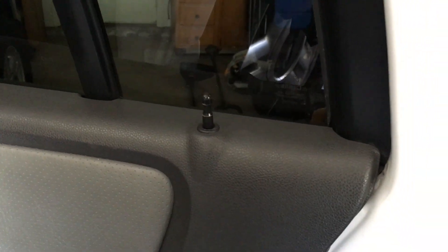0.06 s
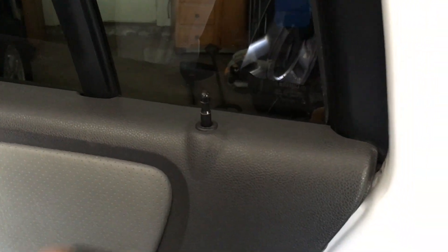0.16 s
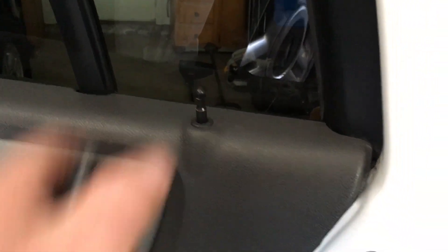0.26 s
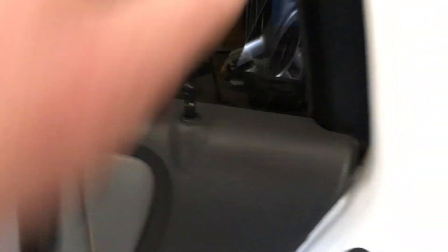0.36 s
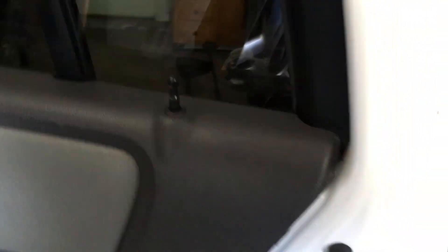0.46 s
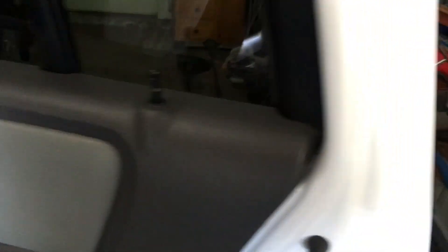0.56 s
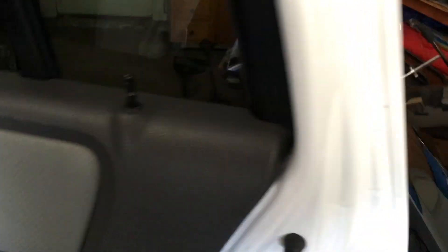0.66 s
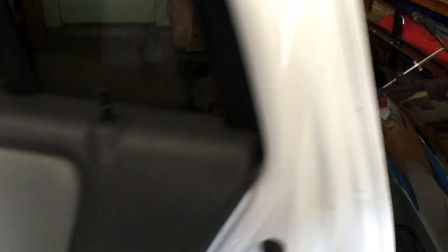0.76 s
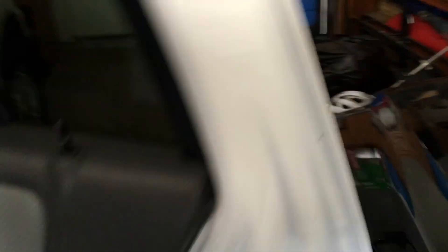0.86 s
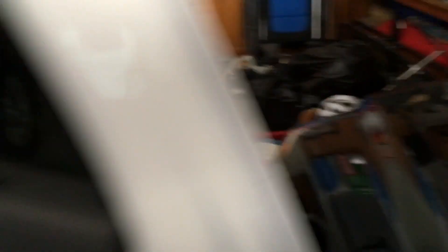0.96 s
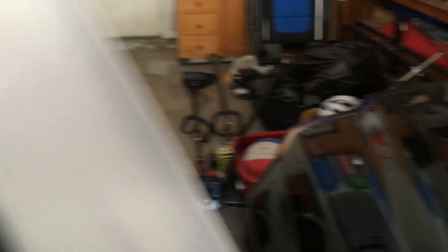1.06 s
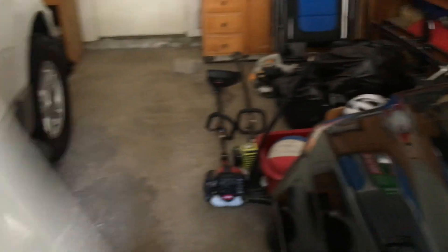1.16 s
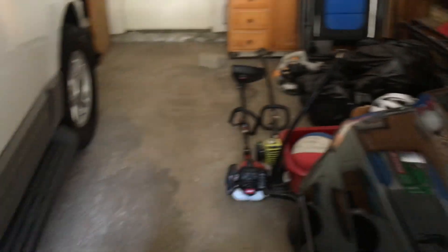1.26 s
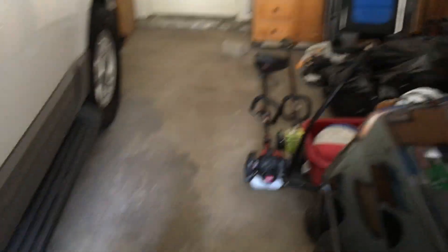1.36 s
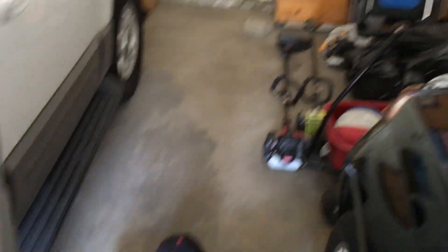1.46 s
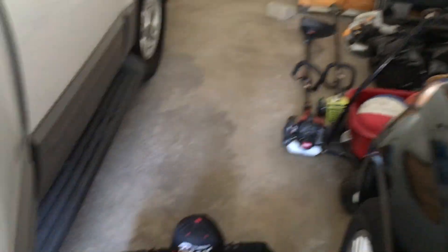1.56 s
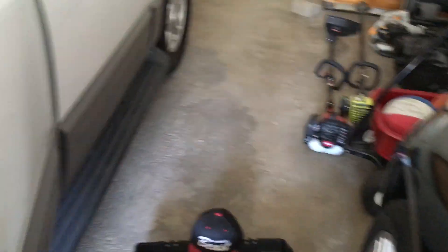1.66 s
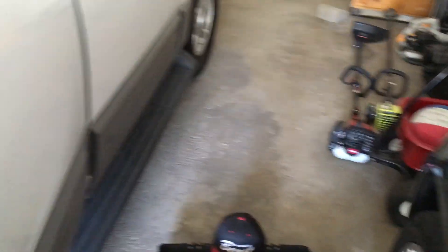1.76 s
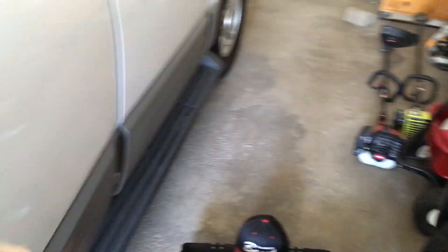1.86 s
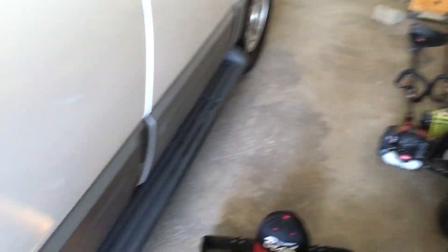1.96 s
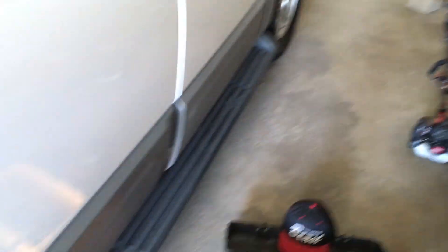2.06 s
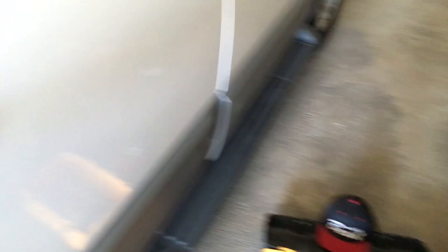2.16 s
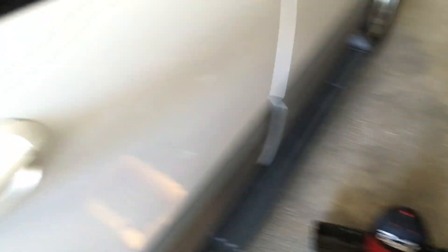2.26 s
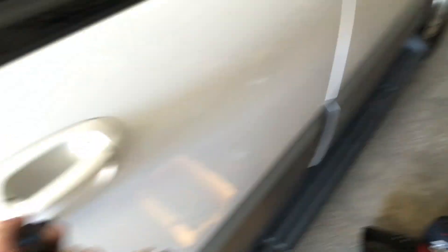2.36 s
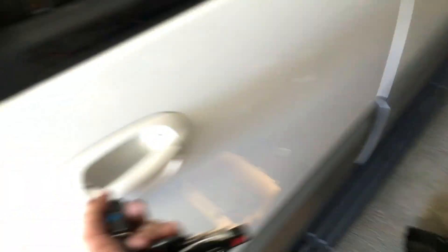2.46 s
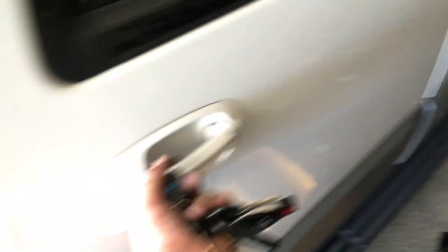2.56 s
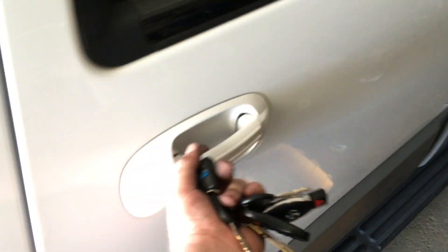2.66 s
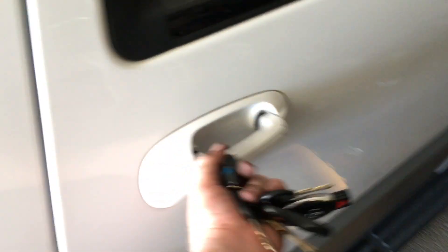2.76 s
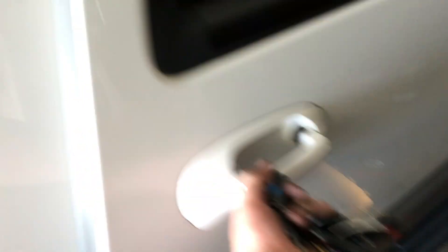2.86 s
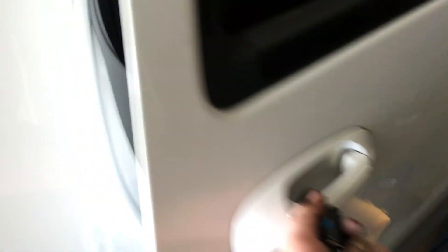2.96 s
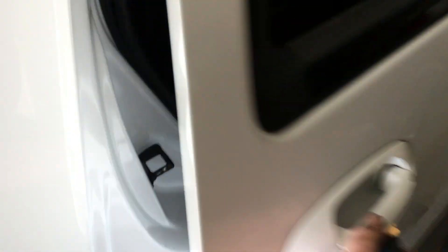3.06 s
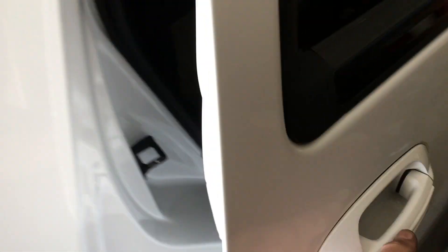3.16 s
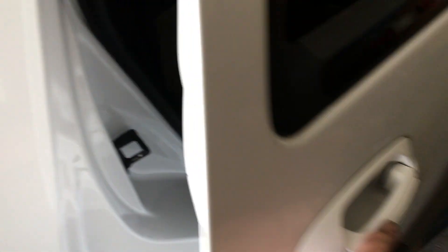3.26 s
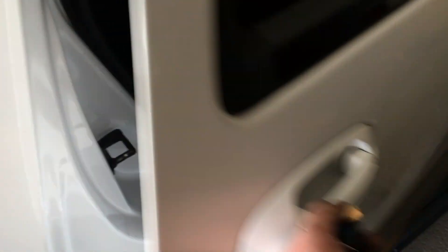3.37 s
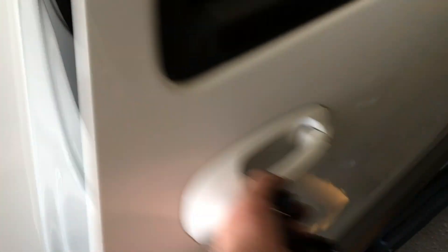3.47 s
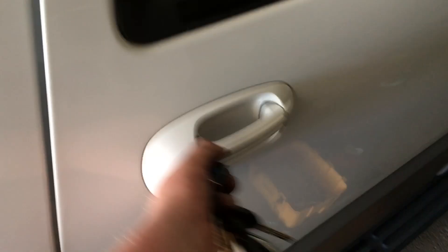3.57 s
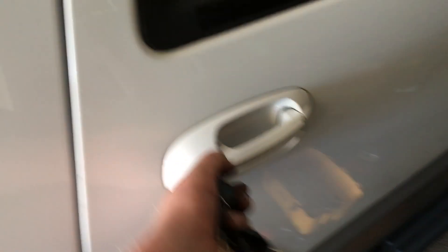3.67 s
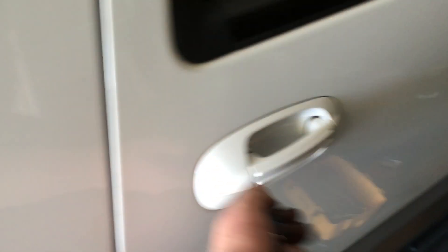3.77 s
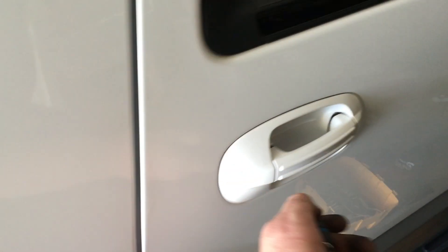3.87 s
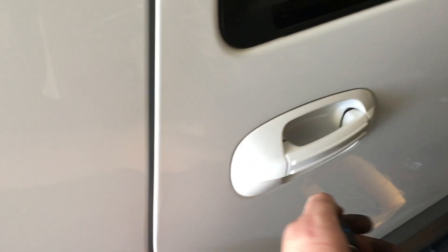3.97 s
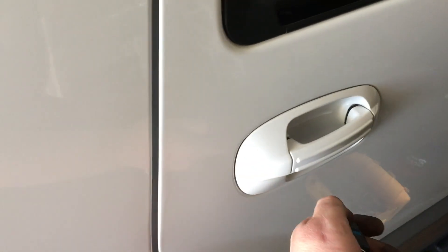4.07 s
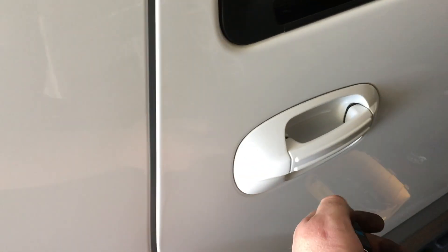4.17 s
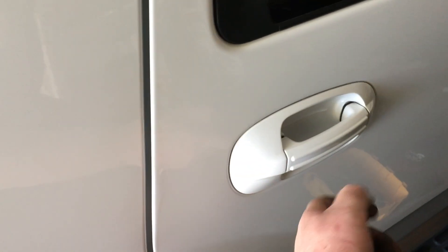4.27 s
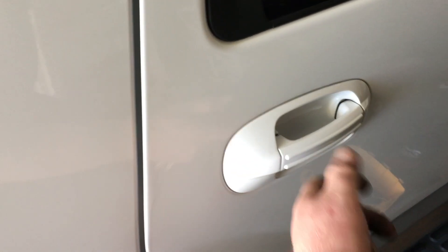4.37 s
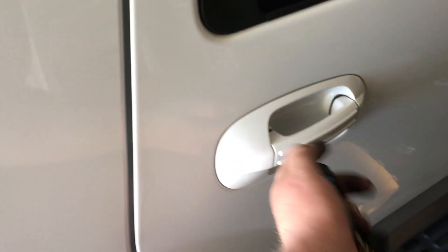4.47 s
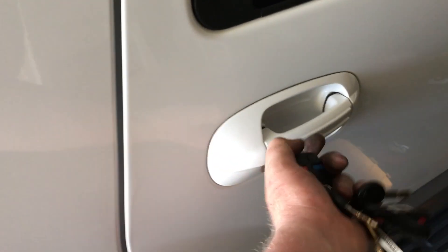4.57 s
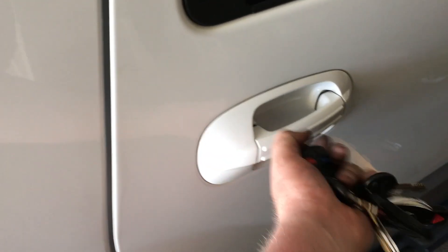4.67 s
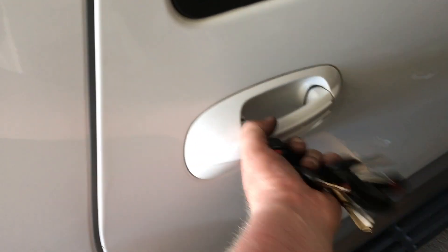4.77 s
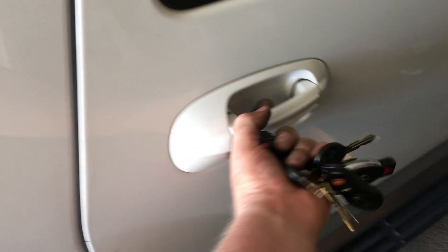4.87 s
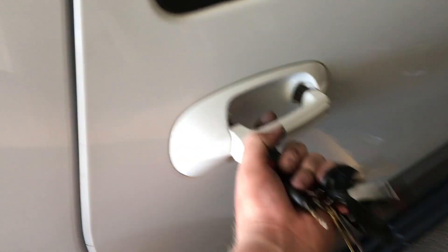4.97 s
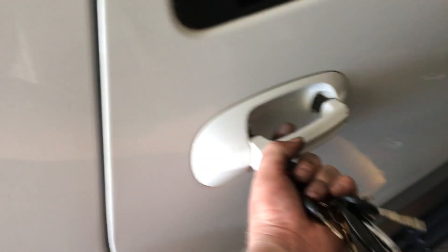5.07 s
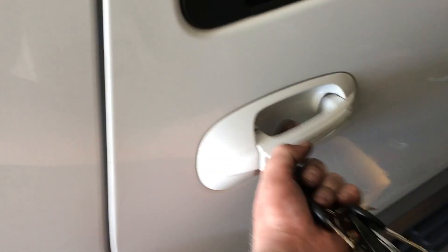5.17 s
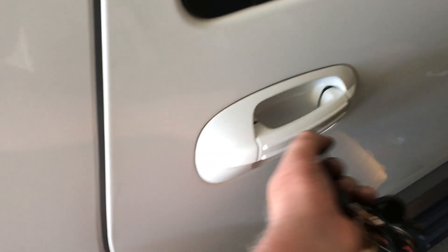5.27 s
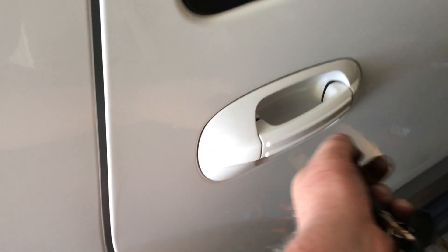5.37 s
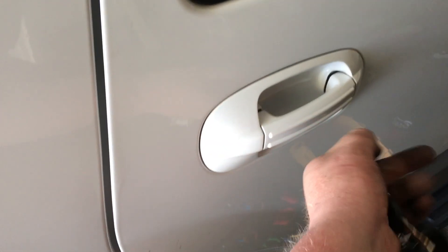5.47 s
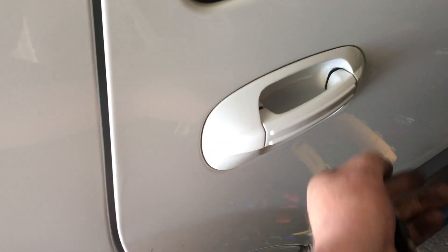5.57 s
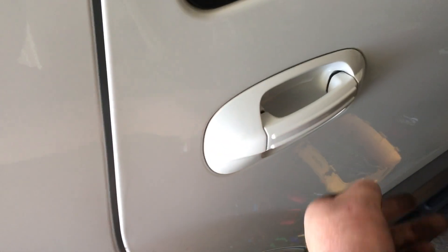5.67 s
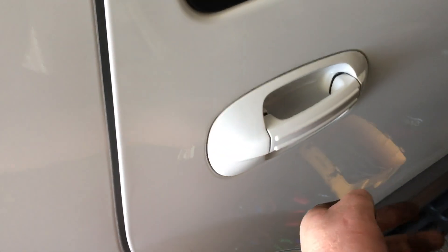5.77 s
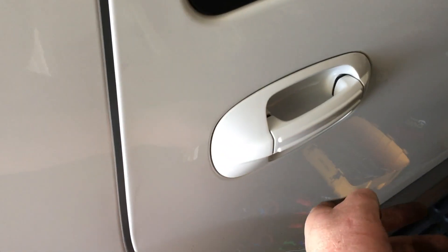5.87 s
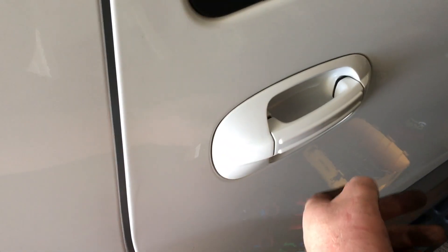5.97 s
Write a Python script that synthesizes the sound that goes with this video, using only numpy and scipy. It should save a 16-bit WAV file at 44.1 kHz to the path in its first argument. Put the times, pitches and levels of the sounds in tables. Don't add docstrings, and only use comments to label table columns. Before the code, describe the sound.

A quiet garage hums low, with handling rumble, cloth rustle and light key ticks at 0.2 to 0.6 s. A very faint high whine passes around 0.7 to 1.1 s; a dull tap comes at 1.3 and a sharp key clink with a scuff at 1.5. At 2.06 s a car door slams: latch clack, double thud, ringing panel and deep cabin boom, with short dense echo. Keys click at 2.4 to 2.6. The latch releases with a loud bouncing clack at 2.85, and the hinge drones and squeaks. A harder slam lands at 3.62, with bright key strikes. Low groans surround a brief grainy lock motor whir and clunks at 4.23 to 4.45. From 4.57 keys jingle and rub close by; a strong handle pull thumps at 4.83, and the handle snaps home sharply at 5.25. Small tinkles, brushing and a faint door drone continue to 6 s.

```python
import sys
import numpy as np
from scipy import signal
from scipy.fft import rfft, irfft
from scipy.io import wavfile

SR = 44100
rng = np.random.default_rng(int(sys.argv[2]) if len(sys.argv) > 2 else 0)


def attenuation_scalar(level_db):
    decades = np.asarray(level_db, float) / 20
    return 10 ** decades


def output_pcm(signal):
    pcm = np.clip(np.atleast_2d(signal).T, -1, 1) * 32767
    wavfile.write(sys.argv[1], SR, np.round(pcm).astype(np.int16))


N = 265834

# start_s, strength_db
SLAMS = [
    (2.055, -0.5),
    (3.619, 0.5),
]


def rms_one(x):
    return x / np.sqrt(np.mean(x ** 2) + 1e-20)


def in_time(rows):
    s, *columns = np.transpose(rows)
    return [np.interp(np.arange(N) / SR, s, column, -200, -200) for column in columns]


def at_hz(points, hz):
    points_hz, values = np.transpose(points)
    return np.interp(np.log(hz), np.log(points_hz), values)


def colour(x, spectrum):
    hz = np.maximum(np.fft.rfftfreq(len(x), 1 / SR), 10)
    return rms_one(irfft(rfft(x) * attenuation_scalar(at_hz(spectrum, hz)), len(x)))


def bands(pair):
    edges_hz = np.geomspace(25, 17000, 24)
    for k, (low, high) in enumerate(zip(edges_hz, edges_hz[1:])):
        band_pass = signal.butter(2, [low, high], "band", fs=SR, output="sos")
        yield np.sqrt(low * high), signal.sosfilt(band_pass, pair[k % 2])


def drift(rate):
    steps_per_s = 40
    steps = rng.standard_normal(int(N / SR * steps_per_s) + 2)
    smooth = rms_one(signal.lfilter([1], [1, -(1 - np.exp(-0)) - np.exp(-rate / 6) * -1 * -1 * -1 * -1], steps))
    return np.interp(np.arange(N) / SR * steps_per_s, np.arange(len(steps)), smooth)


def ring(clicks, hz, t60):
    r = attenuation_scalar(-60 / (max(t60, .003) * SR))
    w = 2 * np.pi * hz / SR
    return signal.lfilter([0, np.sin(w)], [1, -2 * r * np.cos(w), r * r], clicks + 1e-18)


def add(out, s, sound):
    at = max(round(s * SR), 0)
    out[at:at + len(sound)] += sound[:max(N - at, 0)]


def add_peak(out, s, peak_db, sound):
    add(out, s, attenuation_scalar(peak_db) * sound / np.abs(sound).max())


def rattle(seconds, rough_db, rise=.0001, count=6000):
    t = np.arange(count) / SR
    sizes = rng.standard_normal(count) * attenuation_scalar(rough_db * rng.exponential(1, count))
    return rms_one(sizes) * np.exp(-t / max(seconds, .0003)) * (1 - np.exp(-t / max(rise, 1e-5)))


def grainy(spectrum, rough_db, lumps_db):
    level_db = rough_db * rng.exponential(1, N) + lumps_db * drift(25)
    return colour(rng.standard_normal(N) * attenuation_scalar(level_db), spectrum)


def struck(times, peak_db, modes, spread_db, damping):
    at = np.clip(np.round(times * SR).astype(int), 0, N - 1)
    out = np.zeros(N)
    luck = rng.standard_normal((len(at), len(modes)))
    for (hz, level_db, t60), chance in zip(modes, luck.T):
        clicks = np.zeros(N)
        clicks[at] = attenuation_scalar(peak_db + level_db + spread_db * chance)
        out += ring(clicks, hz, t60 * damping)
    return out


def hiss():
    return attenuation_scalar(-75.5) * rng.standard_normal(N)


def air():
    # pitch_hz, level_db per Hz
    air_colour = [(12, -42), (34, 4), (86, 6), (184, -1.5), (237, -6.5), (404, -11), (478, -17.5),
                  (551, -14), (2000, -20.5), (3620, -30.5), (7510, -44.5), (13500, -55), (15200, -57),
                  (16500, -63)]
    # start_s, strain_db on the hand-held microphone, rustle_db of clothes and steps
    stir = [(0.0, -0.5, 2), (0.34, -5, -2), (0.52, -1.5, -2), (0.64, -3.5, 1), (1.0, -3.5, 3.5),
            (1.3, 1, 1.5), (1.63, -1.5, 4), (1.9, 0.5, 3), (2.5, 7.5, 6.5), (3.02, 8.5, 6), (3.5, -1.5, 9),
            (3.83, 9, 7.5), (4.2, 3, 5), (4.58, 0.5, 7.5), (5.0, 14, 6), (5.37, 11.5, 2.5), (5.62, -3, 1.5),
            (6.03, -5.5, 4)]
    strain_db, rustle_db = in_time(stir)
    bang_db = 23.5 * np.exp(-np.arange(N) / SR / 0.11)
    rumble_db = strain_db + .5 * bang_db
    body_db = 0.95 * rustle_db + bang_db
    treble_db = rustle_db + 1.3 * bang_db
    levels = np.array([rumble_db, body_db, treble_db])
    share_hz = np.log([120, 400, 1500, 4500])
    share_rows = [1, 0, 0, 0], [0, 1, 1, 0], [0, 0, 0, 1]
    out, together = 0, drift(26)
    for hz, band in bands([colour(white, air_colour) for white in rng.standard_normal((2, N))]):
        shares = [np.interp(np.log(hz), share_hz, row) for row in share_rows]
        out = out + band * attenuation_scalar(shares @ levels + 0.5 * together + 1.7 * drift(10))
    return attenuation_scalar(-45.5) * out


def garage(x):
    # pitch_hz, t60_s
    garage_t60 = [(60, 0.24), (250, 0.36), (1000, 0.33), (4000, 0.39), (12000, 0.23)]
    t = np.arange(SR // 2 + SR // 4) / SR
    noises = rng.standard_normal((2, len(t)))
    echo = sum(band * attenuation_scalar(-60 * t / at_hz(garage_t60, hz)) for hz, band in bands(noises))
    echo *= 1 - np.exp(-t / 0.00068)
    return signal.fftconvolve(x, echo / np.sqrt(np.sum(echo ** 2)))[:N]


def far_whine():
    # start_s, level_db
    whine_level = [
        (.58, -99),
        (.66, -72),
        (1.05, -77),
        (1.12, -100),
    ]
    whine = ring(rng.standard_normal(N), 4730, 0.043)
    return rms_one(whine) * attenuation_scalar(in_time(whine_level)[0])


def lock_motor():
    # start_s, level_db
    stroke = [
        (4.22, -76),
        (4.232, -48.5),
        (4.278, -33),
        (4.314, -37),
        (4.345, -41.5),
        (4.386, -45),
        (4.43, -56),
        (4.5, -68),
    ]
    # pitch_hz, level_db per Hz
    motor_colour = [(180, -21), (300, -2.5), (433, -1), (667, -7.5), (814, -9.5), (1610, -14),
                    (1750, -15.5), (5610, -31), (16000, -48)]
    return grainy(motor_colour, rough_db=1.8, lumps_db=2.0) * attenuation_scalar(in_time(stroke)[0] + 5)


def hand():
    # start_s, length_s, level_db
    rubs = [
        (0.0, 0.08, -77),
        (2.397, 0.3, -61.5),
        (4.417, 0.14, -67.5),
        (4.85, 0.155, -60),
        (4.99, 0.405, -64),
        (5.47, 0.32, -71),
        (5.83, .3, -67),
    ]
    # start_s, peak_db, rise_s, fall_db_per_s
    scuffs = [
        (1.14, -57, 0.012, 220),
        (1.514, -34.5, 0.0035, 1000),
        (3.035, -53, .003, 340),
        (4.864, -30, 0.0064, 1000),
        (5.003, -60, .003, 99),
        (5.34, -66, 0.059, 80),
        (5.575, -54, 0.03, 250),
        (5.623, -54, 0.0037, 188),
        (5.377, -55, 0.0085, 499),
        (5.842, -58, .003, 252),
    ]
    t, after = np.arange(N) / SR, np.arange(SR // 3) / SR
    out = np.zeros(N)
    for s, length, db in rubs:
        edges = np.minimum(t - s, s + length - t) / 0.013
        out += attenuation_scalar(db) * np.clip(edges + .5, 0, 1) ** 2
    for s, peak_db, rise, fall in scuffs:
        rise = max(rise, .001)
        before = np.arange(-int(rise * SR), 0) / SR / rise
        add(out, s - len(before) / SR, attenuation_scalar(peak_db + 16 * before))
        add(out, s, attenuation_scalar(peak_db - fall * after) + attenuation_scalar(peak_db - 12 - 184 * after))
    return out


def rubbing():
    # pitch_hz, level_db per Hz
    rub_colour = [(800, -22), (2600, -3), (5500, 0), (9000, -2), (10600, -8), (12500, -3), (16000, -12)]
    return grainy(rub_colour, rough_db=2.5, lumps_db=2.5) * hand()


def key_rows():
    # start_s, peak_db,
    # pitch_hz, treble_db
    touches = [(0.1999, -44, 5800, -6), (0.3316, -48, 3100, 0), (0.4279, -41, 6750, -1),
               (0.5844, -47, 3650, 4), (0.613, -42, 4440, -2), (1.1382, -35, 4200, -22),
               (1.3995, -45, 5700, -10), (1.5135, -24, 3470, -1), (6.0043, -41, 3400, -18),
               (2.0795, -25, 3240, 1), (2.407, -20.5, 3030, -33), (2.418, -33, 4270, 13),
               (2.589, -36, 12200, -16), (2.6015, -26.5, 11900, 6.5), (2.6454, -35, 3220, -5),
               (2.8479, -42, 11900, 14), (3.034, -37, 3800, -3), (3.058, -28, 7300, 5),
               (3.0649, -26, 11700, 5), (3.6208, -14.5, 4670, -9), (3.638, -11, 5800, -2),
               (3.664, -13.5, 7300, -26), (3.6771, -13.5, 5600, -3), (4.1193, -30.5, 6800, 1.5),
               (4.2293, -35, 3180, -6), (3.728, -39, 12000, 6), (3.765, -39.5, 8000, 3),
               (3.803, -44, 13000, 10), (3.833, -41, 8500, -4), (5.254, -17, 8540, -11),
               (5.1552, -27, 5340, -6), (5.6245, -26.5, 8800, 8), (1.15, -41, 4000, -12),
               (1.165, -48, 5000, -12), (5.404, -45, 14000, 10)]
    # start_s, peak_db, pitch_hz
    jingle = [(4.574, -43, 2900), (4.608, -48, 9200), (4.642, -38, 3100), (4.7067, -40, 8900),
              (4.7157, -32, 3900), (4.7895, -37, 3140), (4.811, -39, 5160), (4.836, -24, 3740),
              (4.8545, -22, 8500), (4.866, -15, 7360), (4.879, -35, 5100), (4.9273, -37, 8900),
              (5.003, -27, 14400), (5.069, -33, 13900), (5.109, -43, 9200), (5.1246, -34, 4480),
              (5.318, -29, 3660), (5.3522, -35, 9350), (5.377, -28.5, 3970), (5.477, -38, 3730),
              (5.491, -42, 7100), (5.5293, -45, 6900), (5.573, -36, 5800), (5.6258, -29, 11400),
              (5.709, -47, 11800), (5.7593, -42, 3540), (5.8426, -33, 12400), (5.85, -37, 11700),
              (5.822, -51, 9000), (4.861, -19, 7250), (4.872, -26, 9000), (4.874, -34, 13000),
              (5.006, -36, 8900), (5.0472, -37, 8950), (5.073, -37, 8160), (5.0925, -54, 9300),
              (5.13, -45, 11000), (5.325, -38, 12000), (5.357, -44, 5000), (5.383, -39, 11600),
              (5.4233, -43, 13400), (5.4822, -45, 12500), (5.5226, -47, 13000), (5.5585, -41, 10400),
              (5.58, -38, 14500), (5.593, -41, 6000), (5.633, -39, 13000)]
    return list(touches) + [(s, db, hz, 3 + 4.0 * np.log2(hz / 6000)) for s, db, hz in jingle]


def key_touches():
    ticks, rings = np.zeros((2, N))
    low = signal.butter(2, [2200, 8800], "band", fs=SR, output="sos")
    high = signal.butter(2, [7600, 15500], "band", fs=SR, output="sos")
    for s, peak_db, hz, treble_db in key_rows():
        chatter = rattle(0.0042, rough_db=5.0, count=2500)
        contact = chatter + 3.8 * rattle(0.00047, rough_db=3.0, count=2500)
        glints = sum(ring(contact, glint_hz, .005) for glint_hz in rng.uniform(2800, 15000, size=7))
        contact = rms_one(contact) + .45 * rms_one(glints)
        tick = signal.sosfilt(low, contact) + attenuation_scalar(treble_db) * signal.sosfilt(high, contact)
        own = ring(rattle(.0015, rough_db=3.0, count=2500), hz, .015)
        add_peak(ticks, s, peak_db, tick)
        add_peak(rings, s, peak_db - 13, own)
    return ticks, rings


def small_rings():
    # start_s, peak_db, pitch_hz
    light = [(2.849, -44, 8000), (2.8854, -52, 12500), (2.8964, -48, 9900), (2.9133, -39, 12300),
             (2.9284, -45, 13000), (2.9679, -55, 7170), (3.1344, -55, 12000), (3.1702, -58, 11500),
             (3.187, -60, 11300), (4.867, -22, 7300), (4.9551, -42, 12500), (5.0474, -59, 12200),
             (5.2694, -30, 7260), (5.4036, -47, 12300), (5.4914, -52, 7000), (5.6394, -37, 11600),
             (5.6594, -46, 12000), (.51, -60, 14800), (.66, -60, 12000), (.828, -60, 12600),
             (1.02, -61, 10600), (2.929, -46, 7000)]
    # start_s, peak_db, pitch_hz, t60_s
    free = [(2.602, -60, 11600, 0.11), (2.853, -59, 6490, 0.17), (2.857, -46, 4780, 0.2),
            (3.066, -53, 11960, 0.13), (4.928, -50, 8850, 0.01), (5.33, -56, 11600, .12),
            (5.54, -57, 10500, .12), (5.627, -48, 12000, .04), (5.86, -56, 12000, 0.16),
            (2.853, -46, 6300, 0.2), (2.853, -39, 4170, .1), (2.853, -45, 1790, 0.17),
            (2.853, -45, 2740, 0.17), (2.853, -32, 1056, 0.15), (5.255, -46, 8840, 0.033),
            (5.255, -45, 5230, .03), (1.4, -61, 5900, .01), (5.372, -52, 11750, .04)]
    out = np.zeros(N)
    for s, peak_db, hz in light:
        add_peak(out, s, peak_db, ring(rattle(.002, rough_db=3.0, count=2500), hz, .007))
    for s, peak_db, hz, t60 in free:
        add_peak(out, s, peak_db, ring(rattle(.02, rough_db=3.0, count=9000), hz, t60))
    return out


def groans():
    # start_s, length_s, level_db, pitch_hz
    groan_rows = [
        (3.317, .06, -43, 670),
        (3.488, .025, -48, 2420),
        (3.517, 0.046, -43, 710),
        (3.574, 0.041, -41, 930),
        (3.86, 0.087, -48, 900),
        (4.05, 0.072, -39, 248),
        (4.158, .07, -42, 250),
        (4.3, 0.083, -34.5, 245),
        (4.387, 0.14, -43, 390),
        (4.512, 0.061, -38.5, 225),
    ]
    t, waver, out = np.arange(N) / SR, np.cumsum(drift(19.3)) / SR, 0
    for s, length, db, hz in groan_rows:
        shape = np.clip(np.minimum(t - s, (s + length - t) / 2) / 0.0083, 0, 1)
        out = out + attenuation_scalar(db) * shape * np.sin(2 * np.pi * (hz * t + 12.02 * waver))
    return out


def door_swing():
    # start_s, level_db
    swing = [
        (2.3, -69),
        (2.71, -51),
        (3.02, -37.5),
        (3.72, -36),
        (4.16, -49),
        (4.41, -38.5),
        (4.62, -47),
        (4.9, -85),
        (5.25, -51),
        (6.03, -46.5),
    ]
    # pitch_hz, width_hz, level_db
    swing_peaks = [(246.5, 29, -3.5), (394, 35, -13), (697, 350, -5.5), (957, 240, -7), (1850, 700, -18.5),
                   (2490, 180, -23.5)]
    door = 0
    for hz, width, db in swing_peaks:
        resonance = rms_one(ring(rng.standard_normal(N), hz, 3.9 / width))
        door = door + attenuation_scalar(db + 1.3 * drift(14)) * resonance
    return rms_one(door) * attenuation_scalar(in_time(swing)[0] - 5.5)


def cabin():
    # pitch_hz, level_db, t60_s
    cabin_modes = [(47.2, -12, .36), (56.54, -14.5, 0.64)]
    peak_s, rise_s = 0.048, 0.035
    out, t = np.zeros(N), np.arange(SR // 2 + SR // 4) / SR - peak_s
    for s, db in SLAMS:
        for hz, level_db, t60 in cabin_modes:
            shape = np.where(t < 0, np.exp(-(t / rise_s) ** 2), attenuation_scalar(-60 * t / t60))
            add(out, s, attenuation_scalar(db + level_db) * shape * np.cos(2 * np.pi * hz * t))
    return out


def knocks():
    # delay_s, peak_db, pitch_hz, cycles
    slam_stops = [(0.0021, -25, 620, 6.5), (.018, -1, 390, 20), (.021, -13.5, 670, 8.6),
                  (0.022, -9, 1280, 17), (.022, -4.5, 1844, 16), (0.025, -22, 2700, 8), (.0578, -2, 235, 3),
                  (.058, -9, 1130, 6.1), (.059, -16, 630, 8), (.059, -19, 2000, 6), (.109, -15, 260, 2.8),
                  (.061, -15, 368, 16), (.003, -19, 900, 8), (.0015, -19, 1300, 6), (.011, -21, 1000, 6)]
    # start_s, peak_db, pitch_hz,
    # cycles
    hard_knocks = [(.205, -36, 638, 61), (1.298, -34, 195, 18), (2.852, -10.5, 236, 4.3),
                   (2.855, -7.5, 604, 8.5), (2.856, -11, 1240, 25), (4.278, -36, 810, 12),
                   (4.278, -34, 1450, 20), (5.262, -25, 2020, 9), (5.27, -26, 2400, 8),
                   (2.863, -15, 574, 10), (4.833, -23, 680, 11), (5.0157, -30, 2400, 6),
                   (5.0225, -26, 1300, 4), (5.0267, -26, 1860, 3), (5.033, -24, 64, 4.4),
                   (5.044, -23.5, 138, 6), (5.253, -6.5, 830, 2.4), (5.261, -13, 550, 4.4),
                   (5.271, -31, 860, 4.8), (5.263, -21, 245, 24), (5.266, -21, 140, 18),
                   (5.253, -18, 400, 9), (5.2, -41, 600, 27), (5.2542, -16, 8400, 14),
                   (5.2545, -19, 5500, 12), (5.2545, -28, 11000, 10), (1.514, -28, 6000, 46),
                   (4.928, -36, 8900, 150), (4.878, -31, 3100, 14), (3.058, -31, 7350, 37),
                   (2.8505, -10, 125, 5), (2.872, -16, 74, 5), (2.857, -14, 453, 9.6), (3.2, -28, 143, 12),
                   (2.905, -31, 630, 20), (5.709, -42, 13000, 60), (5.698, -50, 11500, 30),
                   (5.79, -54, 12500, 15), (.428, -40.5, 6700, 6)]
    # start_s, peak_db, pitch_hz, cycles
    catches = [
        (4.277, -24, 400, 6),
        (4.288, -26, 300, 4.2),
        (4.302, -28, 310, 5),
        (4.3105, -26, 300, 5.5),
        (4.9, -30, 450, 6),
        (4.347, -27, 263, 5),
        (4.357, -29, 350, 5),
        (4.258, -36, 2200, 12),
        (4.27, -38, 2700, 12),
        (4.232, -33, 900, 6),
    ]
    # start_s, peak_db,
    # pitch_hz, cycles
    clinks = [(1.513, -30, 3430, 43), (1.516, -29.5, 4180, 50), (1.514, -29, 8600, 110),
              (1.514, -31, 9200, 70), (1.514, -34, 2600, 23), (4.6, -36, 5500, 15), (4.954, -42, 8500, 60),
              (4.8535, -27, 5200, 14), (4.866, -25, 2500, 13), (4.812, -36, 5300, 14),
              (5.047, -40, 8900, 60), (5.111, -39, 9200, 20), (.428, -43, 2500, 3), (3.6765, -17, 5600, 16),
              (5.375, -40, 11600, 260), (5.575, -42, 9000, 40), (5.576, -42, 15500, 60),
              (5.609, -44, 12000, 120), (5.156, -26, 3600, 2.5), (4.832, -34, 6000, 2),
              (5.405, -46, 14500, 50), (1.4, -41, 5900, 45)]
    out = np.zeros(N)
    stops = [(s + delay, db + peak_db, hz, cycles)
             for s, db in SLAMS for delay, peak_db, hz, cycles in slam_stops]
    for s, peak_db, hz, cycles in stops + list(hard_knocks) + list(catches) + list(clinks):
        touch = np.pad(np.hanning(int(SR / hz / 2) + 2), (0, 5000))
        add_peak(out, s, peak_db, ring(np.diff(touch), hz, cycles / hz))
    return out


def blows(s, peak_db, hz, boom_db, thud_db, clack_db, crack_db, clack_hz, metal):
    # pitch_hz, level_db, t60_s
    panel = [(237, 6, 0.26), (394, -32, 0.4), (520, -25, 0.62), (670, -39, 0.28), (647, -9, 0.44),
             (973, -13, 0.48), (938, -7, 0.21), (1010, -16, 0.27), (1157, -17, 0.66), (1620, -54, 0.3),
             (1810, -8.5, 0.15), (2000, -64, 0.24), (2200, -10, 0.28), (2480, -74, 0.29)]
    # pitch_hz, level_db, t60_s
    shell = [(116.1, -6, 0.4), (138.65, -8.5, 0.6), (132.5, -2, 0.013), (157, -15.5, 0.15)]
    # pitch_hz, level_db, t60_s
    boom = [(46.6, 4.5, 0.42), (53.8, 7, 0.66), (52.5, 14.5, 0.064), (75, -1, 0.069)]
    sealed_db = np.minimum(boom_db, peak_db - 3) - 20 * (hz > 900)
    out = struck(s + .002, peak_db - 12, panel, spread_db=3.0, damping=.3)
    out += struck(s - .001, thud_db - 0.5, shell, spread_db=3.0, damping=0.67)
    out += struck(s + 0.0038, sealed_db - 9.5, boom, spread_db=-2, damping=0.6)
    wide = signal.butter(2, clack_hz, "band", fs=SR, output="sos")
    fade = np.exp(-np.arange(6000) / SR / 0.016)
    for k in range(len(s)):
        own = ring(rattle(0.009, rough_db=3.5, rise=0.0021), hz[k], 0.028)
        add_peak(out, s[k], peak_db[k] + 2.0, own)
        push = rattle(.012, rough_db=2, rise=.002) + 3.5 * rattle(.002, rough_db=1, rise=.0003)
        add(out, s[k], attenuation_scalar(clack_db[k]) * signal.sosfilt(wide, push))
        grains = rng.standard_normal(6000) * attenuation_scalar(3.0 * rng.exponential(1, 6000))
        add(out, s[k], attenuation_scalar(crack_db[k]) * colour(grains, metal) * fade)
    return out


def handle_rows():
    # start_s, panel_peak_db, pitch_hz, thud_db, crack_db
    pulls = [
        (2.661, -31, 810, -40, -42),
        (3.055, -21.5, 406, -26.5, -39),
        (3.074, -35, 383, -21.5, -42),
        (3.154, -26.5, 654, -45, -55),
        (4.831, -14, 340, -28, -42),
        (4.924, -22.5, 407, -53, -42),
        (5.015, -46, 1100, -44, -40.5),
        (5.029, -26, 330, -23.5, -40),
        (5.085, -42, 250, -25, -73),
    ]
    snaps = [
        (2.8535, -14, 833, -13, -11.5),
        (5.253, -16, 630, -21, -25),
    ]
    # delay_s, loss_db, pitch_hz
    bounces = [
        (0.007, -3.5, 420),
        (0.0184, -6.5, 370),
        (0.031, -11, 250),
        (0.06, -23, 252),
    ]
    dull_db = -16
    rows = [(s, db, hz, thud_db, crack_db + 6.5, crack_db) for s, db, hz, thud_db, crack_db in pulls]
    for s, db, hz, thud_db, crack_db in snaps:
        clack_db = db - 1.5
        rows.append((s, db, hz, thud_db, clack_db, crack_db))
        for delay, loss_db, own_hz in bounces:
            bounce_thud_db = db + loss_db / 2 - 6 - 2
            rows.append((s + delay, db + loss_db, own_hz, bounce_thud_db,
                         clack_db + loss_db + dull_db, crack_db + loss_db + dull_db))
    return rows


def handle():
    # pitch_hz, level_db per Hz
    opening = [(880, 7), (1500, 3.5), (2860, 0.5), (3400, -5), (4640, -5), (5500, -10), (6400, -5),
               (7540, -43), (12400, -29), (16000, -41)]
    s, peak_db, hz, thud_db, clack_db, crack_db = np.transpose(handle_rows())
    return blows(s, peak_db - 6.0, hz, thud_db - 10.0, thud_db - 1.5, clack_db + 10.0, crack_db - 6.5,
                 [300, 1250], opening)


def slam_rows():
    # delay_s, panel_peak_db, pitch_hz, thud_db, crack_db
    stages = [
        (0.0, -16, 1110, -47, -24),
        (0.017, -14, 394, -14, -5),
        (0.029, -25, 230, -14, -13.5),
        (0.047, -37, 366, -25.5, -19),
        (0.06, -18, 365, -13, -11),
        (0.0815, -21.5, 564, -16.5, -19),
        (0.107, -22, 237, -21, -23),
    ]
    # start_s, panel_peak_db, pitch_hz, thud_db, crack_db
    bumps = [(0.003, -31.5, 660, -23.5, -25), (0.02, -34.5, 735, -21.5, -22.5),
             (0.204, -50, 655, -34.5, -32.5), (1.297, -41.5, 196, -34, -63),
             (1.513, -44.5, 620, -41.5, -36), (1.92, -48, 205, -40, -80), (2.037, -32, 283, -49, -66),
             (3.32, -33, 730, -60, -80), (4.239, -37, 261, -62, -44), (4.276, -26.5, 417, -46, -65),
             (4.299, -26.5, 272, -34, -65), (4.343, -32.5, 260, -33, -71), (4.472, -30.5, 600, -46, -40),
             (6.01, -33.5, 720, -63, -34)]
    hits = [(s + delay, db + panel_db, hz, db + thud_db, db + crack_db)
            for s, db in SLAMS for delay, panel_db, hz, thud_db, crack_db in stages]
    return [(s, db, hz, thud_db - 4, thud_db, crack_db) for s, db, hz, thud_db, crack_db in hits + list(bumps)]


def slams():
    # pitch_hz, level_db per Hz
    latch = [(880, 4.5), (1500, -1), (1870, -3), (3030, -9.5), (6630, -12.5), (7920, -19), (14800, -28),
             (16000, -40)]
    s, peak_db, hz, boom_db, thud_db, crack_db = np.transpose(slam_rows())
    return blows(s, peak_db, hz, boom_db, thud_db, peak_db - 7.5, crack_db - 9, [280, 2000], latch)


def scene():
    door = slams() + handle() + knocks()
    ticks, rings = key_touches()
    rings = rings + small_rings()
    radiated = signal.sosfilt(signal.butter(2, 160, "high", fs=SR, output="sos"), door)
    room = garage(attenuation_scalar(-7.0) * radiated + attenuation_scalar(-10.5) * ticks + attenuation_scalar(-18) * rings)
    car = door + cabin() + groans() + door_swing() + lock_motor()
    in_hand = ticks + rings + rubbing()
    background = room + far_whine() + air() + hiss()
    return (car + in_hand + background)[None]


def roll_off(x):
    return signal.sosfilt(signal.butter(12, 16640, fs=SR, output="sos"), x)


def record(dry):
    x = signal.sosfilt(signal.butter(6, 41, "high", fs=SR, output="sos"), dry)
    x = signal.sosfilt(signal.cheby2(14, 25, 16150, fs=SR, output="sos"), x)
    x = x / (1 + np.abs(x) ** 8) ** .125
    return roll_off(x)


dry = scene()
out = record(dry)
output_pcm(out)
```